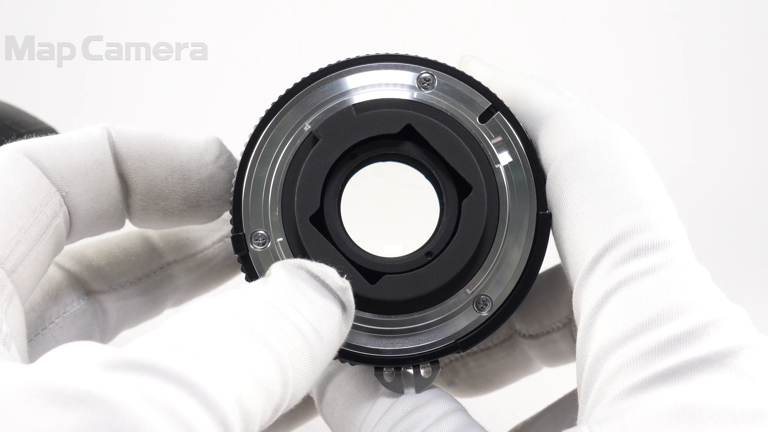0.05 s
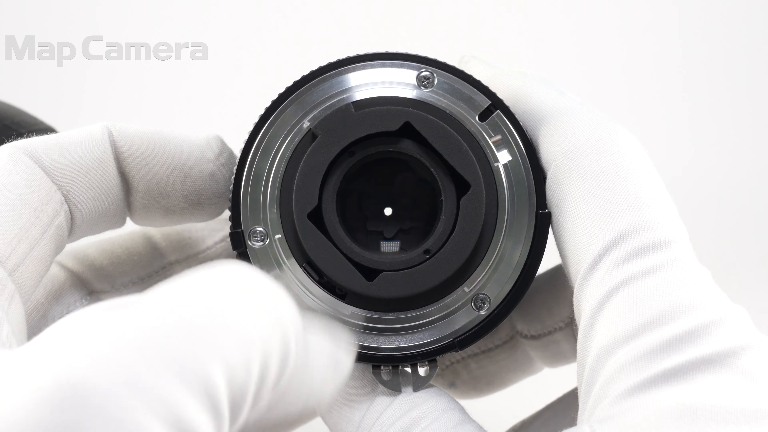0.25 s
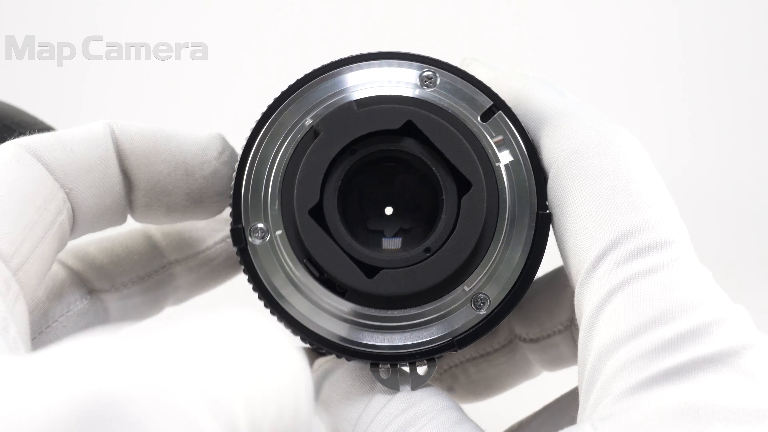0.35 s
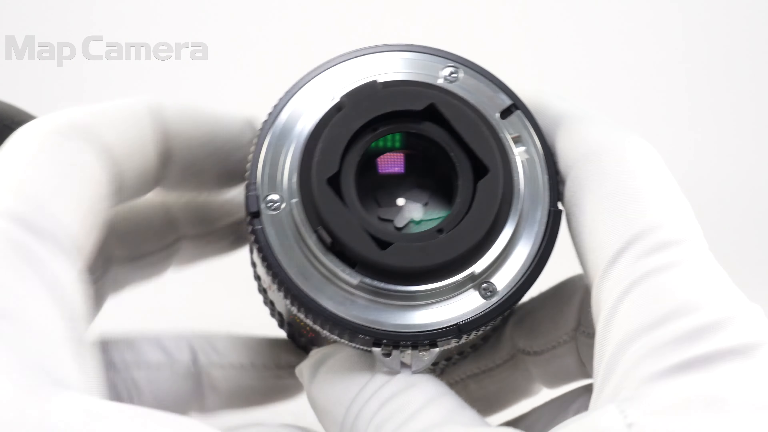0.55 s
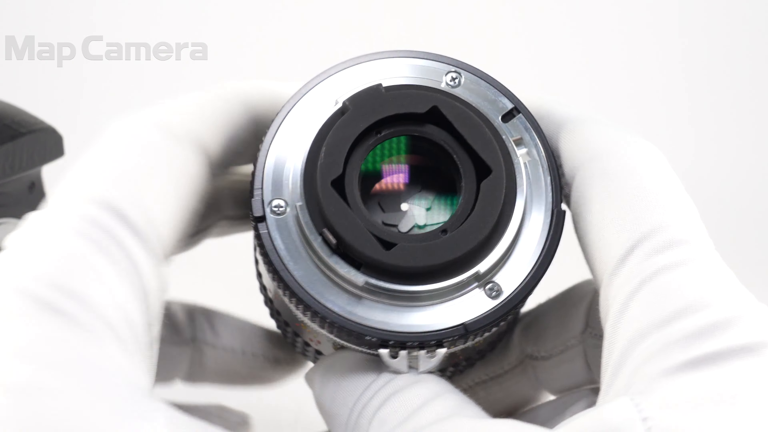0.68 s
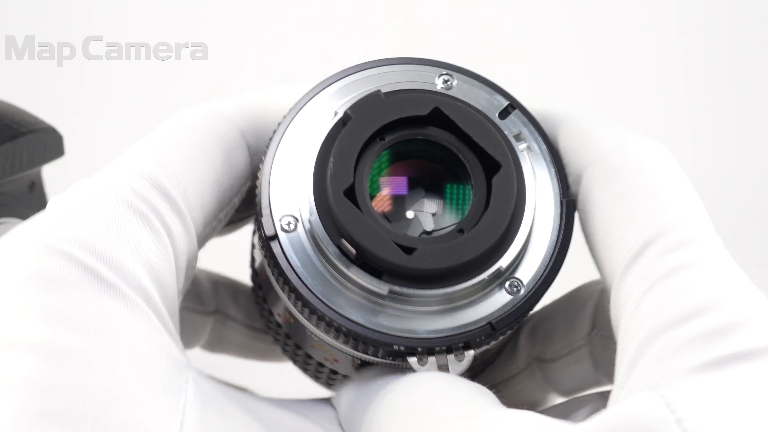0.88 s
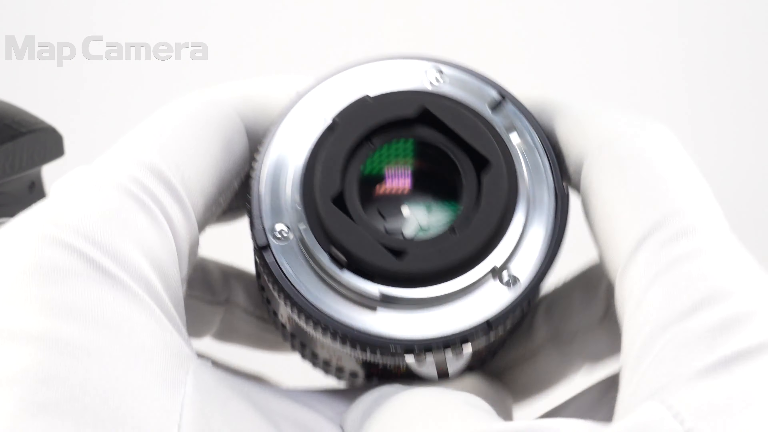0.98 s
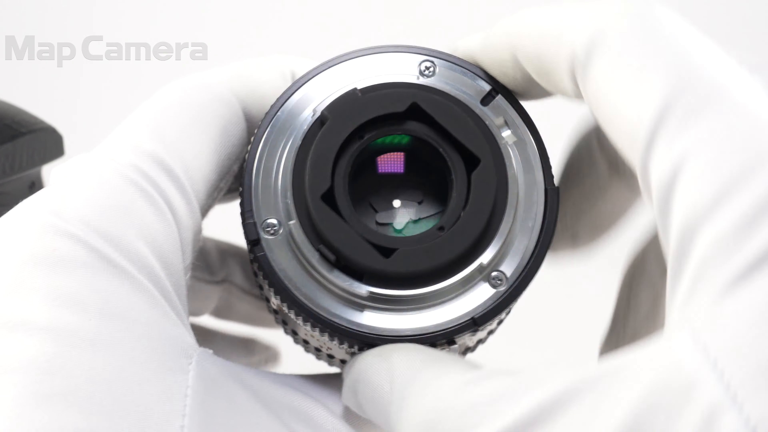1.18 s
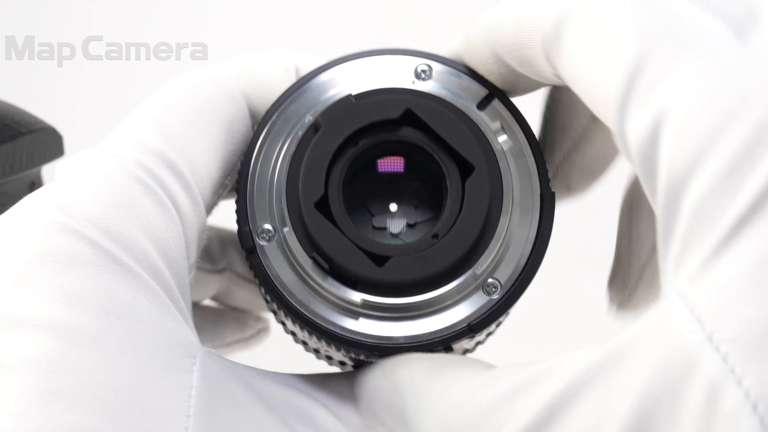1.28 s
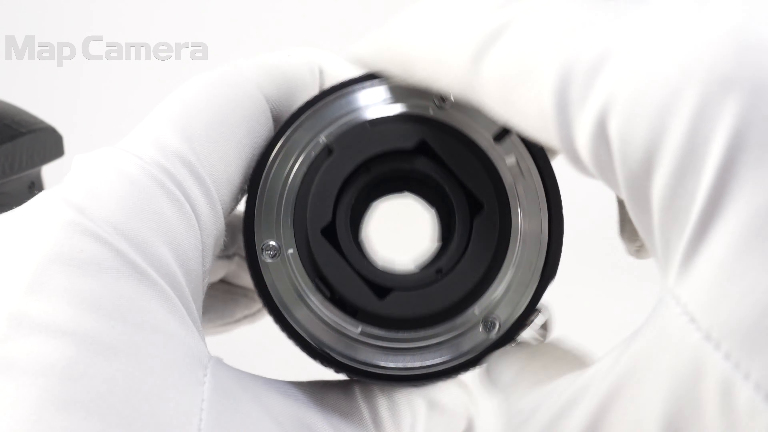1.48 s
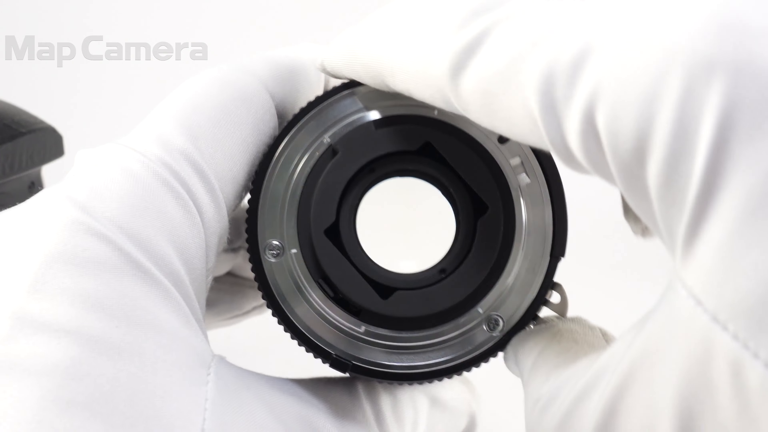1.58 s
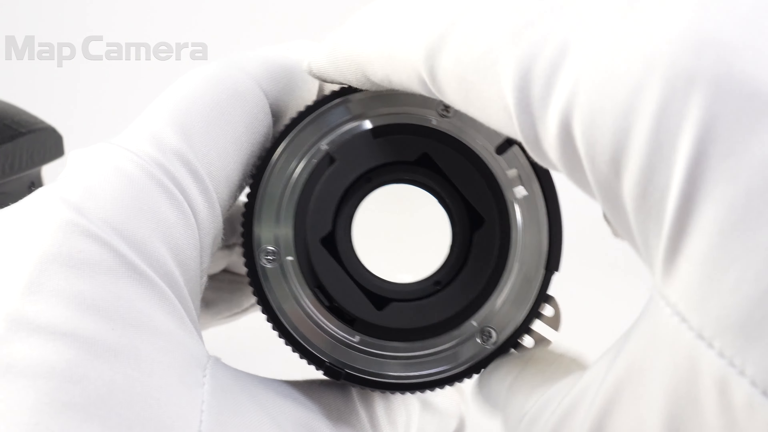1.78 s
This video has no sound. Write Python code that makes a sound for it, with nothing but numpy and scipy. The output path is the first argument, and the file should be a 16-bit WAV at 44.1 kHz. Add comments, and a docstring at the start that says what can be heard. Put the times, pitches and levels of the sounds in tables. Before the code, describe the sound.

A manual camera lens handled very close in a quiet room with faint hum. Gloves slide lightly on metal, then at 0.22-0.24 s the iris snaps shut with a loud, bright, rattling clack. Soft cloth rasp and grip thuds follow, with a faint low bump near 0.96 s. From 1.39 to 1.57 s seven crisp ticks run evenly, ending in a stronger knock at 1.58 s; quiet rubbing fades.

```python
"""A quiet room: gloved hands work a manual camera lens close to the microphone.
The aperture lever slips off a fingertip and the iris snaps shut; the focusing ring turns with a soft rasp
and bumps its stop; the aperture ring ticks through seven detents and knocks against its end stop.
Blows are decaying noise clatter over damped modes; cloth is dense random clicks, filtered;
the room is filtered noise with a wavering hum, one table bounce and a short tail."""
import sys
import numpy as np
from scipy import signal
from scipy.fft import rfft, irfft
from scipy.io import wavfile

SR = 44100
rng = np.random.default_rng(int(sys.argv[2]) if len(sys.argv) > 2 else 0)


def wrap_up_sound(samples):
    """Save the sound to the file named by the first command line argument, as 16-bit audio."""
    columns = np.atleast_2d(samples).T
    # keep every value between -1 and 1, then stretch to whole-number steps
    tamed = np.clip(columns, -1, 1)
    steps = np.round(tamed * 32767).astype(np.int16)
    wavfile.write(sys.argv[1], SR, steps)


N = 81585
TIME_S = np.arange(N) / SR
FREQS_HZ = np.fft.rfftfreq(N, 1 / SR)
BLOW_SAMPLES = 8192

# room air spectrum [f/Hz, density/dB]
AIR_COLOUR = [(20, -16), (50, -5.5), (85, -1.5), (130, -6.5), (200, -4), (265, 4.5), (330, -5), (410, 1.5),
              (550, -7.5), (1000, -11.5), (3000, -19), (8000, -26), (15500, -30)]
AIR_LEVEL_DB = -54.5
# ventilation hum and electrical whine [f/Hz, level/dB]
HUM_TONES = [(82, -59), (100, -59.5), (257, -64), (13184, -80)]
HUM_WAVER_RATIO, HUM_WAVER_WIDTH_HZ = 0.22, 5

# glove slides over the mount [t/s, level/dB, rise/s, t60/s, squeak/dB]
GLOVE_SLIDES = [(.005, -55.5, .03, .25, -11), (.059, -43.5, 0.047, .19, 0.5),
                (.212, -58.5, .05, 0.089, -13), (.41, -61, .1, .15, -20)]
# slide spectrum [f/Hz, gain/dB]
SLIDE_COLOUR = [(200, -11), (700, 6), (1400, -2), (2600, 1.5), (3500, -2.5), (6500, -5), (9000, -7.5),
                (12500, -15.5), (16000, -25)]
# squeak bands of the rubbed mount [f/Hz, width/Hz, gain/dB]
SQUEAK_BANDS = [(2490, 33, -6.5), (2750, 48, -4.5), (4450, 140, -6.5), (4586, 68.8, -1)]
# fingers take a new grip [t/s, level/dB, rise/s, t60/s, scuff/dB]
NEW_GRIPS = [(.31, -47, 0.07, 0.27, -20), (.405, -48.5, 0.069, 0.17, -11), (.515, -40.5, 0.0074, 0.23, -6),
             (.565, -51.5, 0.082, 0.39, 5), (.605, -53, .07, 0.16, -1), (.74, -56, .1, 0.17, -15),
             (.96, -44, 0.095, 0.18, -5.5), (1.085, -48.5, .04, 0.21, -8), (1.39, -51.5, 0.096, 0.28, 6),
             (1.66, -48.5, 0.041, 0.35, -6)]
# grip thud spectrum [f/Hz, gain/dB]
THUD_COLOUR = [(80, -27), (200, -12.5), (290, -0.5), (365, -0.5), (470, -6.5), (700, -18), (1500, -31),
               (4000, -60)]
# grip scuff spectrum [f/Hz, gain/dB]
SCUFF_COLOUR = [(200, -20), (500, -3.5), (830, 1), (1200, -4), (2300, -7.5), (3500, -15), (6000, -26),
                (16000, -40.5)]
# cloth rasp on the turning rings [t/s, level/dB]
RASP_LEVEL = [(.46, -72.5), (.52, -60.5), (.61, -53), (.7, -51.5), (.83, -52), (.98, -52.5), (1.08, -59),
              (1.13, -59), (1.25, -57.5), (1.34, -59), (1.38, -51.5), (1.56, -48.5), (1.63, -74),
              (1.70, -57), (1.78, -68), (1.85, -74.5)]
# rasp spectrum [f/Hz, gain/dB]
RASP_COLOUR = [(200, -14), (500, 1), (900, 1), (1600, -1.5), (3000, 1), (5000, -3.5), (8000, -7),
               (12000, -10.5), (16000, -21)]
GRAINS_PER_S, GRAIN_SPREAD_DB = 6000, 2.5

# blows of the sprung iris lever [t/s, level/dB, slide/s, ring/dB, treble/dB]
IRIS_BLOWS = [(0.2206, -29.5, 0.00082, -9.5, -13), (.2235, -35, .002, -13, -12),
              (0.2386, -17.5, .005, -12.5, 5), (.2407, -8.5, .002, 0, 0.5), (.2437, -17, .002, -6.5, -3)]
# blades scrape louder as they sweep shut, shiver as they settle [t/s, level/dB, rise/s, t60/s]
BLADE_SCRAPES = [(0.2362, -33.5, 0.054, .02), (.266, -30, .06, 0.053)]
# modes of barrel and mount [f/Hz, level/dB, t60/s]
BARREL_MODES = [(2015, -23, .055), (2975, -13, 0.043), (3900, -7, 0.032), (4355, -13.5, 0.044),
                (4466, 3.5, 0.008), (4900, -14, 0.05), (5105, -10, .04), (5340, -11, .06),
                (5770, -16, 0.066), (6940, -27.5, .14), (7685, -10.5, .04), (8040, -14.5, .055),
                (9940, -12.5, 0.072), (11080, -13.5, .04), (12125, -19, .035), (14450, -16, .04)]
# iris clatter spectrum [f/Hz, density/dB]
IRIS_COLOUR = [(60, -18), (400, -17.5), (700, -22.5), (1100, -13.5), (1600, -16), (2200, -5.5), (4800, 1.5),
               (6400, -5), (9500, -4), (14500, -5), (16000, -18)]
# iris clatter decay [first t60/s, tail/dB, tail t60/s]
IRIS_CLATTER_DECAY = (0.021, -17, .08)

# focusing ring bump [t/s, level/dB, half length/s, f/Hz, sag/(Hz/s)]
FOCUS_BUMP = (.961, -36.5, .0135, 372, 900)

# aperture detents [t/s, level/dB, ball ride up the notch/s, ring/dB, zing/dB, treble/dB]
DETENT_BLOWS = [(1.3877, -18.5, .002, -0.5, 3, 0), (1.4212, -23, .004, -5, 7.5, 3.5),
                (1.4488, -20.5, .003, -3, 7.5, 0), (1.4804, -22, .003, -1.5, 7, 0),
                (1.5090, -23, .008, -0.5, -2, 2.5), (1.5400, -22.5, .009, -5.5, -0.5, 5.5),
                (1.5706, -22, 0.0048, -8.5, 2, 5)]
# end stop blow [t/s, level/dB, slide/s, ring/dB, treble/dB]
END_STOP_BLOW = (1.58, -13, .001, -2.5, -1.5)
# modes of the aperture ring [f/Hz, level/dB, t60/s], scattered at each detent
RING_MODES = [(1017, -10.5, 0.033), (2346, -16.5, 0.082), (2600, -8, .032), (2830, 5, 0.0085),
              (2930, -6.5, .032), (3520, -13, .04), (4370, -15, .035), (5090, -10.5, 0.037),
              (5680, -13.5, .03), (6350, -13.5, 0.033), (8000, -7.5, 0.019), (9000, -8, 0.024),
              (13930, -12, 0.03), (14490, -15, .04)]
# the grip changes the ring's modes from one detent to the next (standard deviations)
MODE_SCATTER_DB, MODE_DETUNE_RATIO = 1.5, 0.0063
# detent ball clatter spectrum [f/Hz, density/dB]
BALL_COLOUR = [(100, -24), (600, -18.5), (950, -2.5), (1500, -11.5), (2100, -1.5), (2800, 7), (4000, -3.5),
               (6500, -6.5), (9000, -5.5), (11500, -12), (14300, -6.5), (16000, -9.5)]
# end stop clatter and blade scrape spectrum [f/Hz, density/dB]
KNOCK_COLOUR = [(100, -29), (700, -22), (1200, -11), (2000, -8.5), (3200, -0.5), (4900, 1.5), (5900, -10),
                (6700, -0.5), (9000, -5), (12000, -9.5), (16000, -18)]
# detent clatter decay [first t60/s, tail/dB, tail t60/s]
BALL_CLATTER_DECAY = (0.02, -14.5, 0.067)
# end stop clatter decay [first t60/s, tail/dB, tail t60/s]
KNOCK_CLATTER_DECAY = (0.022, -10, 0.052)
ZING_HZ, ZING_WIDTH_HZ, TREBLE_HZ = 8700, 700, 12000
RING_LOW_CUT_HZ = 800  # the modes' ringing is thinned below this

TABLE_DELAY_S, TABLE_DB = 0.001407, -16
ROOM_T60_S, ROOM_DB = 0.14, -24
# stereo side spectrum [f/Hz, side/dB]
SIDE_COLOUR = [(20, -46), (2800, -44.5), (4800, -26), (8000, -18.5), (14000, -11)]
SPREAD_T60_S = 0.0108
CLIP_LEVEL, BAND_EDGE_HZ = .88, 15950


def amp(db):
    """Decibels to amplitude ratio."""
    return np.exp(np.asarray(db) * (np.log(10) / 20))


def unit(x):
    """Scales to RMS 1."""
    return x / np.sqrt(np.mean(x ** 2) + 1e-20)


def gains(points, hz=FREQS_HZ):
    """Spectrum points to a gain per frequency, interpolated in dB over log frequency."""
    at_hz, db = np.transpose(points)
    return amp(np.interp(np.log(hz + 1), np.log(at_hz), db))


def bell(centre, width, at=FREQS_HZ):
    """Gaussian of height 1, over frequency or time."""
    return np.exp(-.5 * np.minimum(abs(at - centre) / width, 10) ** 2)


def shape(x, gain):
    """Filters by a gain per frequency."""
    return irfft(rfft(x) * gain, len(x))


def noise(gain):
    """Steady filtered noise, RMS 1."""
    return unit(shape(rng.standard_normal(N), gain))


def swell(peak_s, rise_s, t60_s, time_s=TIME_S):
    """Climbs 60 dB in the rise time, peaks, dies 60 dB per t60; floor at -120 dB."""
    t = time_s - peak_s
    return amp(-60 * np.minimum(np.maximum(t / t60_s, -t / rise_s), 2))


def friction(colour):
    """Thousands of tiny catches, as random filtered clicks."""
    hits = rng.random(N) < GRAINS_PER_S / SR
    catches = hits * rng.choice([-1, 1], N)
    sizes_db = GRAIN_SPREAD_DB * np.minimum(rng.exponential(1, N), 4)
    return unit(shape(catches * amp(sizes_db), gains(colour)))


def add(mix, start_s, sound):
    """Adds a sound in place, cut at the end of the mix."""
    part = mix[round(start_s * SR):][:len(sound)]
    part += sound[:len(part)]


def diffuse(x, t60_s):
    """Smears a sound with a dying tail of random reflections."""
    t = np.arange(BLOW_SAMPLES) / SR
    tail = rng.standard_normal(BLOW_SAMPLES) * swell(0, t60_s, t60_s, t)
    return signal.oaconvolve(x, tail / np.linalg.norm(tail))[:N]


def blow(strike_s, db, slide_s, ring_db, treble_db, modes, colour, decay, zing_db=0):
    """Metal slides, then strikes: a clatter of small parts over ringing modes."""
    first_t60_s, tail_db, tail_t60_s = decay
    time_s = np.arange(BLOW_SAMPLES) / SR - slide_s
    hz = np.fft.rfftfreq(BLOW_SAMPLES, 1 / SR)

    chatter = unit(shape(rng.choice([-1., 1.], BLOW_SAMPLES), gains(colour, hz)))
    first = swell(0, slide_s, first_t60_s, time_s)
    tail = amp(tail_db) * swell(0, slide_s, tail_t60_s, time_s)
    clatter = chatter * np.hypot(first, tail)

    t = np.maximum(time_s, 0)  # modes stay silent until the strike
    ring = np.zeros(BLOW_SAMPLES)
    for k, (mode_hz, mode_db, t60_s) in enumerate(modes):
        ring += (-1) ** k * amp(mode_db - 60 * t / t60_s) * np.sin(2 * np.pi * mode_hz * t)
    ring = shape(ring, hz / np.hypot(hz, RING_LOW_CUT_HZ))

    treble_tilt_db = treble_db * np.minimum(hz / TREBLE_HZ, 1) ** 2
    tone = amp(treble_tilt_db + zing_db * bell(ZING_HZ, ZING_WIDTH_HZ, hz))
    return strike_s - slide_s, amp(db) * shape(clatter + amp(ring_db) * ring, tone)


def room_tone():
    """Soft air noise, wavering ventilation hum and a faint electrical whine."""
    hum = np.zeros(N)
    for hz, db in HUM_TONES:
        sine = np.sqrt(2) * np.sin(2 * np.pi * (hz * TIME_S + rng.random()))
        waver = HUM_WAVER_RATIO * noise(bell(hz, HUM_WAVER_WIDTH_HZ))
        hum += amp(db) * (sine + waver)
    return hum + amp(AIR_LEVEL_DB) * noise(gains(AIR_COLOUR))


def gloves():
    """Cloth rasps on the rings, squeaks on the mount and thuds softly at each new grip."""
    out = amp(np.interp(TIME_S, *np.transpose(RASP_LEVEL))) * friction(RASP_COLOUR)

    slide = friction(SLIDE_COLOUR)
    squeak = noise(sum(amp(db) * bell(hz, width_hz) for hz, width_hz, db in SQUEAK_BANDS))
    for peak_s, db, rise_s, t60_s, squeak_db in GLOVE_SLIDES:
        out += amp(db) * swell(peak_s, rise_s, t60_s) * (slide + amp(squeak_db) * squeak)

    thud, scuff = noise(gains(THUD_COLOUR)), friction(SCUFF_COLOUR)
    for peak_s, db, rise_s, t60_s, scuff_db in NEW_GRIPS:
        out += amp(db) * swell(peak_s, rise_s, t60_s) * (thud + amp(scuff_db) * scuff)
    return out


def iris():
    """The lever slips; the blades sweep shut, hit, bounce and shiver."""
    scrape_level = sum(amp(db) * swell(peak_s, rise_s, t60_s) for peak_s, db, rise_s, t60_s in BLADE_SCRAPES)
    out = friction(KNOCK_COLOUR) * scrape_level
    for row in IRIS_BLOWS:
        add(out, *blow(*row, BARREL_MODES, IRIS_COLOUR, IRIS_CLATTER_DECAY))
    return out


def focus_stop():
    """A soft, greased landing: a brief low bump that sags in pitch."""
    peak_s, db, half_s, hz, sag_hz_per_s = FOCUS_BUMP
    t = TIME_S - peak_s
    cycles = (hz - .5 * sag_hz_per_s * t) * t
    return amp(db) * bell(peak_s, half_s, TIME_S) * np.sin(2 * np.pi * cycles)


def aperture_ring():
    """A sprung ball drops into each notch; the end stop rings the lower modes of the barrel."""
    out = np.zeros(N)
    for strike_s, db, ride_s, ring_db, zing_db, treble_db in DETENT_BLOWS:
        modes = []
        for hz, mode_db, t60_s in RING_MODES:
            detuned_hz = hz * (1 + MODE_DETUNE_RATIO * rng.normal())
            modes.append((detuned_hz, mode_db + MODE_SCATTER_DB * rng.normal(), t60_s))
        add(out, *blow(strike_s, db, ride_s, ring_db, treble_db, modes,
                       BALL_COLOUR, BALL_CLATTER_DECAY, zing_db))
    add(out, *blow(*END_STOP_BLOW, BARREL_MODES[:7], KNOCK_COLOUR, KNOCK_CLATTER_DECAY))
    return out


def room(x):
    """One bounce off the table, as a delayed copy, and a faint short tail."""
    bounce = shape(x, np.exp(-2j * np.pi * FREQS_HZ * TABLE_DELAY_S))
    return x + amp(TABLE_DB) * bounce + amp(ROOM_DB) * diffuse(x, ROOM_T60_S)


def scene():
    """Sources sit centrally; a diffused side signal spreads mainly the treble."""
    lens = iris() + aperture_ring() + gloves() + focus_stop()
    mid = room(lens) + room_tone()
    side = shape(diffuse(mid, SPREAD_T60_S), gains(SIDE_COLOUR))
    return np.array([mid + side, mid - side])


def record(dry):
    clipped = np.clip(dry, -CLIP_LEVEL, CLIP_LEVEL)
    low_pass = signal.firwin(255, BAND_EDGE_HZ, window=("kaiser", 8), fs=SR)
    return signal.oaconvolve(clipped, low_pass[None], "same")


dry = scene()
out = record(dry)
wrap_up_sound(out)
```